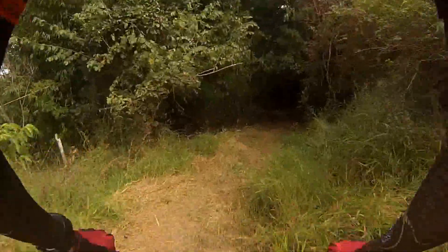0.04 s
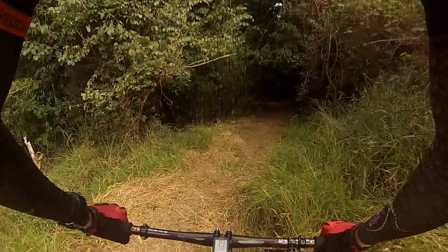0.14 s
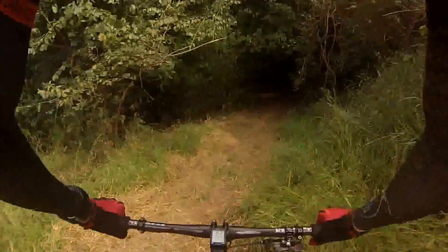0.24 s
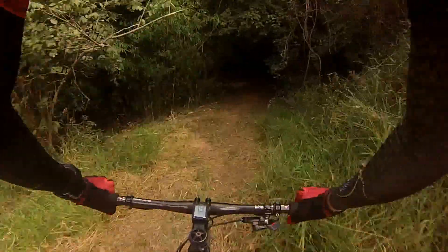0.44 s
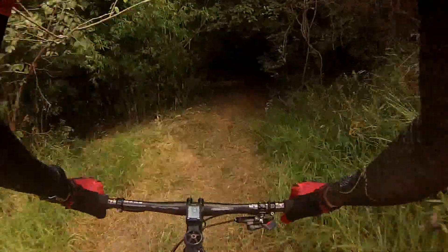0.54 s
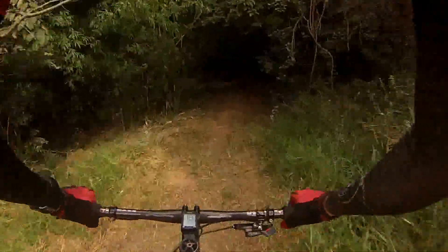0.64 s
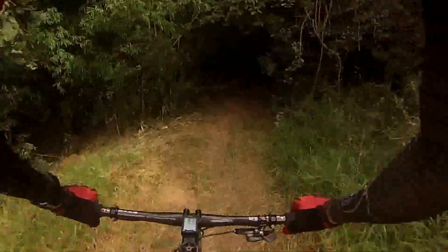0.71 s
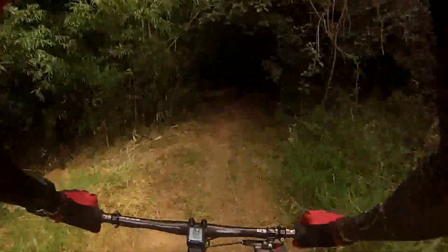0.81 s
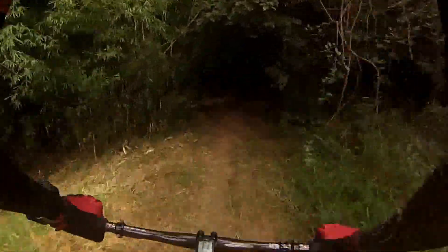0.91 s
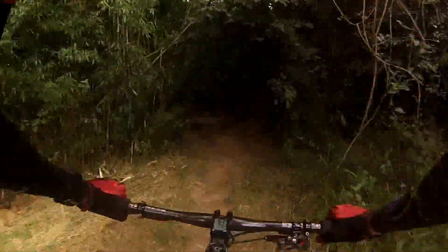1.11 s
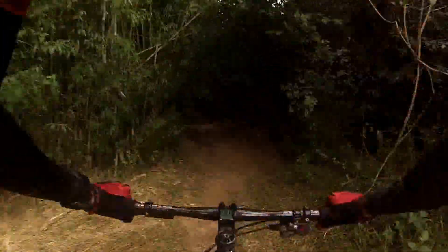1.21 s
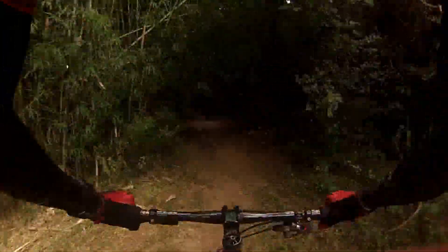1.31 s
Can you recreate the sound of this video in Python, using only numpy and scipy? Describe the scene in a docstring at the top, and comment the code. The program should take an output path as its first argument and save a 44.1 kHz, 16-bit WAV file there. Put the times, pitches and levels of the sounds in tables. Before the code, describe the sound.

A coasting bicycle knocks twice over bumps, then ticks softly amid tyre hiss and wind.

```python
"""A mountain bike coasts down a dirt trail, heard from a camera on the rider's chest.
From the start, tyres hiss and air buffets the microphone; rough ground sets off small rattles.
At 0.21 s and 0.38 s two bumps knock the camera mount into ringing and overload the microphone.
From about the second knock the freewheel's ticking comes and goes, then holds from 0.94 s.
Near 1.3 s metal clinks brightly, and the slow, deep buffeting swells to the end."""
import sys
import numpy as np
from scipy import signal
from scipy.fft import rfft, irfft
from scipy.io import wavfile

SR = 44100
rng = np.random.default_rng(int(sys.argv[2]) if len(sys.argv) > 2 else 0)


def wav_record(signal):
    """Record a signal, one row per channel, as 16-bit PCM in the file named by sys.argv[1]."""
    frames = np.transpose(np.atleast_2d(signal))
    bounded = np.clip(frames, -1, 1)
    # unit amplitude maps onto the largest positive 16-bit level
    quanta = np.round(bounded * 32767).astype(np.int16)
    wavfile.write(sys.argv[1], SR, quanta)


N = 59535
TIME = np.arange(N) / SR


def amp(db):
    """Amplitude ratio of a level in decibels."""
    return 10 ** (np.asarray(db) / 20)


def unit_rms(x):
    """Normalisation to a root mean square of 1."""
    return x / np.sqrt(np.mean(x ** 2) + 1e-20)


def curve(points):
    """Linear interpolation of (time [s], value) points over the scene."""
    return np.interp(TIME, *np.transpose(points))


def since(start):
    """Time elapsed since start [s], zero before it."""
    return np.maximum(TIME - start, 0)


def equalised(x, points, fft_size):
    """Zero-phase filtering by (frequency [Hz], gain [dB]) points."""
    hz, db = np.transpose(points)
    bins_hz = np.fft.rfftfreq(fft_size, 1 / SR)
    gain = amp(np.interp(np.log(bins_hz + 1), np.log(hz + 1), db))
    return irfft(rfft(x, fft_size) * gain, fft_size)[:N]


def noise(spectrum):
    """Spectral shaping of white noise, at unit rms."""
    return unit_rms(equalised(rng.standard_normal(N), spectrum, N))


def smooth(x, seconds):
    """First-order low-pass with the given time constant."""
    pole = np.exp(-1 / (seconds * SR))
    return signal.lfilter([1 - pole], [1, -pole], x)


def ring(modes, t):
    """Free vibration of a struck body: a sum of exponentially damped modes."""
    return sum(amp(db - 60 * t / t60) * np.sin(2 * np.pi * hz * t) for hz, db, t60 in modes)


def burst(start, db, decay):
    """Impact envelope: a quick rise, then exponential decay."""
    age = since(start) / decay
    return 2 * amp(db) * (1 - np.exp(-2 * age)) * np.exp(-age)


def knocks():
    """Impact excitation: after a brief suction the mount cracks, rings and gives a damped push."""
    # hard knocks, the first with a rebound: (time [s], ring level [dB], push level [dB],
    # push frequency [Hz], push decay [s], suction level [dB], crack level [dB])
    impacts = [(0.2085, 2.5, 13, 111.4, 0.0027, -0.5, -7), (0.2114, -20, 1, 77, 0.00095, -3, -28.5),
               (0.3775, -0.43, 0.44, 159, 0.0021, -7.5, -30.5)]
    # modes of the mount: (frequency [Hz], level [dB], 60 dB decay time [s])
    mount_modes = [(960, -6.5, .0105), (1190, -10, .009), (1612, -6, 0.014), (2088, -12.5, 0.018),
                   (2447, -10, 0.013), (2824, -21.5, .009), (3390, -29.5, 0.02), (4380, -27, 0.012),
                   (4930, -27, .011), (6180, -17, 0.012), (7090, -17.5, 0.0095)]
    contact_s, suction_s = 0.00004, 0.00036
    crack_decay_s, crack_cutoff_hz = 0.0017, 4430
    out = np.zeros(N)
    for start, ring_db, push_db, push_hz, push_decay, suction_db, crack_db in impacts:
        t = since(start)
        suction_progress = np.minimum(since(start - suction_s) / suction_s, 1)
        suction = amp(suction_db) * np.sin(np.pi * suction_progress ** 2)
        push = amp(push_db) * np.sin(2 * np.pi * push_hz * t) * np.exp(-t / push_decay)
        ringing = amp(ring_db) * ring(mount_modes, t)
        crack_noise = unit_rms(smooth(rng.standard_normal(N), 1 / (2 * np.pi * crack_cutoff_hz)))
        crack = crack_noise * burst(start, crack_db, crack_decay_s)
        out += smooth(push + ringing - suction, contact_s) + crack
    return out


def shoves():
    """Displacement of air: the mount shifts without striking and makes rounded pressure pulses."""
    # soft shoves of the mount: (time [s], peak level [dB], rise time [s])
    pulses = [(0.021, -36, 0.0041), (0.1003, -29, 0.0025), (0.292, -24.5, 0.0078), (0.371, -6.5, 0.003926)]
    out = np.zeros(N)
    for start, db, rise in pulses:
        age = since(start) / rise
        out += amp(db) * (age * np.exp(1 - age)) ** 4
    return out


def rattles():
    """Damped impacts of bike and ground give noise bursts: clatter, dull bumps and one clink."""
    # rattles of the bike and of stones under the tyres: (time [s], level [dB], decay [s])
    clatter_hits = [(0.012, -57, .015), (0.101, -47, .007), (0.134, -53, .012), (0.222, -45, .025),
                    (0.3198, -36.5, .0022), (0.393, -47, .012), (0.519, -57, .008), (0.959, -55, .008),
                    (1.039, -53, .014), (1.203, -52, .022), (1.270, -54, .012), (1.323, -53, .02),
                    (1.337, -52, .015)]
    # dull bumps, mostly the wheels on the ground, the one at 0.32 s a light tap on the camera mount: (time [s],
    # level [dB], decay [s])
    bump_hits = [(0.089, -40.5, 0.0083), (0.284, -44, 0.015), (0.3202, -39.5, 0.0048),
                 (0.931, -49.5, 0.0059)]
    # one bright metal clink: (time [s], level [dB], decay [s])
    clink_hit = (1.2938, -38.5, 0.0033)
    # spectra of the three kinds of impact: (frequency [Hz], relative level [dB])
    clatter_spectrum = [(100, 1.5), (700, -3), (1100, -2.5), (1650, 1), (2400, -2.5), (4000, -22),
                        (16000, -58.5)]
    bump_spectrum = [(40, -8), (110, 7), (450, -7), (800, -12.5), (3000, -42)]
    clink_spectrum = [(100, 17), (2000, -18), (2650, 13), (3400, -3.5), (4500, -2), (6500, -0.5), (7900, 1),
                      (10000, -4), (16000, -29)]
    clatter = noise(clatter_spectrum) * sum(burst(*hit) for hit in clatter_hits)
    bumps = noise(bump_spectrum) * sum(burst(*hit) for hit in bump_hits)
    clink = noise(clink_spectrum) * burst(*clink_hit)
    return clatter + bumps + clink


def freewheel():
    """Impulse excitation: two pawls slip off each tooth in turn; the hub's ring varies as it turns."""
    # ratchet speed: (time [s], rate [teeth/s])
    tooth_rate = [(.79, 91.6), (.85, 83), (1, 81), (1.07, 75), (1.14, 86), (1.3, 79)]
    # loudness of the ticking: (time [s], level [dB])
    tick_level = [(0, -69), (.3, -72), (.36, -51.5), (.5, -73.5), (.58, -57), (.79, -56.5), (.81, -62),
                  (.91, -66), (.94, -55.5), (1.06, -53), (1.16, -57), (1.22, -54.5), (1.35, -58.5)]
    # modes of the hub: (frequency [Hz], relative level [dB], 60 dB decay time [s])
    hub_modes = [(2595, 1, .029), (2760, -1, .025), (2915, 2.5, .022), (3520, -10, .018), (3770, -1, .025),
                 (4190, -9, .02), (4410, -8, .02), (5000, -8, .016), (5950, -6, .012), (6300, -9, .011),
                 (6650, -8, .011), (7350, -7, .008), (7780, -2, .010)]
    # emphasis of the hub's overtones against its main ring: (time [s], gain [dB])
    overtone_gain = [(.62, -1), (.78, 2), (.95, -3), (1.08, -5)]
    rise_s, jitter_s, tick_spread_db, mode_spread_db = 0.0006, 0.00025, 1.5, 2
    teeth_passed = np.cumsum(curve(tooth_rate)) / SR
    is_overtone = np.array(hub_modes)[:, 0] > 3300  # Hz
    overtone_db = curve(overtone_gain)
    t = TIME[:SR // 20]
    attack = (1 - np.exp(-t / rise_s)) ** 2
    mode_rings = np.array([attack * ring([mode], t) for mode in hub_modes])
    out = np.zeros(N + SR)
    for lag_teeth, pawl_db in ((0, 0), (0.4, -16)):
        for slip in np.flatnonzero(np.diff(np.floor(teeth_passed - lag_teeth))):
            lateness, strength = rng.standard_normal(2)
            scatter_db = mode_spread_db * rng.standard_normal(len(hub_modes))
            tick = amp(is_overtone * overtone_db[slip] + scatter_db) @ mode_rings
            onset = max(slip + int(lateness * jitter_s * SR), 0)
            out[onset:onset + len(t)] += amp(pawl_db + tick_spread_db * strength) * tick
    return unit_rms(out[:N]) * amp(curve(tick_level))


def tyres():
    """Rolling noise: broadband hiss and random cracks of grit, with peaks of hub resonance."""
    # tyre hiss on dirt, with the hub's steady high ring near 6 and 8 kHz:
    # (frequency [Hz], relative spectral density [dB])
    spectrum = [(40, 16), (90, 12), (200, 0), (400, -3), (900, -10), (1550, -8.5), (1950, -10.5),
                (2800, -5), (4100, -10), (5300, -11.5), (6200, -3), (6900, -9), (7800, -3.5), (8500, -11.5),
                (10000, -3), (12000, -19.5), (15000, -14.5), (16000, -56.5)]
    # loudness of the rolling: (time [s], level [dB])
    level = [(0, -49), (.2, -49.5), (.4, -50), (.5, -49.5), (.65, -51), (.87, -52.5), (.96, -52),
             (1.15, -53), (1.35, -55)]
    cracks_per_s, spread_db, grit_to_hiss = 1500, 3, 0.4
    cracks = rng.random(N) < cracks_per_s / SR
    sizes = amp(spread_db * np.minimum(rng.exponential(1, N), 4))
    grit = cracks * sizes * rng.choice([-1, 1], N)
    contact = rng.standard_normal(N) + grit_to_hiss * unit_rms(grit)
    return unit_rms(equalised(contact, spectrum, N)) * amp(curve(level))


def buffet():
    """Turbulence: air passing the microphone makes slow swings of pressure."""
    # pressure of the passing air: (frequency [Hz], relative spectral density [dB])
    spectrum = [(2, -29.5), (9, -5), (16, -1), (24, -14.5), (40, -29), (70, -36.5), (130, -51.5),
                (300, -65.5), (1000, -100)]
    # strength of the buffeting: (time [s], level [dB])
    level = [(0, -26), (.25, -37.5), (.45, -25), (.85, -33), (1.1, -29.5), (1.21, -34), (1.35, -17.5)]
    onset_s = 0.015
    fade_in = 1 - np.exp(-(TIME / onset_s) ** 2)
    return noise(spectrum) * amp(curve(level)) * fade_in


def scene():
    """Superposition of all sources at the one microphone."""
    return (knocks() + shoves() + rattles() + freewheel() + tyres() + buffet())[None]


def record(dry):
    """Saturation: gain control ducks too late to stop a knock overloading; filters then shape the tone."""
    # treble colour of the overloaded knock, applied to the whole sound: (frequency [Hz], gain [dB])
    overload_colour = [(2500, 0.5), (4100, 0.5), (6500, -5), (8200, -2.5), (9900, -10), (11700, -1),
                       (14000, 0), (16000, -13)]
    detector_s, attack_s, recovery_db_per_s, duck_db_per_db = 0.00031, 0.0034, 110.5, 1.775
    knee, bass_cut_hz, bass_cut_q, band_edge_hz = 12, 15.14, 0.76, 15800
    pressure = dry[0]
    power = smooth(pressure ** 2, detector_s)
    excess_db = np.maximum(10 * np.log10(power + 1e-12), 0)  # above full scale
    # each peak of gain reduction is released at a constant rate
    recovery_db = TIME * recovery_db_per_s
    duck_db = np.maximum.accumulate(duck_db_per_db * excess_db + recovery_db) - recovery_db
    ducked = pressure * amp(-smooth(duck_db, attack_s))
    clipped = ducked / (1 + abs(ducked) ** knee) ** (1 / knee)
    omega = 2 * np.pi * bass_cut_hz
    high_pass = signal.bilinear([1, 0, 0], [1, omega / bass_cut_q, omega ** 2], SR)
    coloured = equalised(signal.lfilter(*high_pass, clipped), overload_colour, 2 * N)
    low_pass = signal.firwin(255, band_edge_hz, window=("kaiser", 8), fs=SR)
    return signal.oaconvolve(coloured, low_pass, "same")[None]


dry = scene()
out = record(dry)
wav_record(out)
```